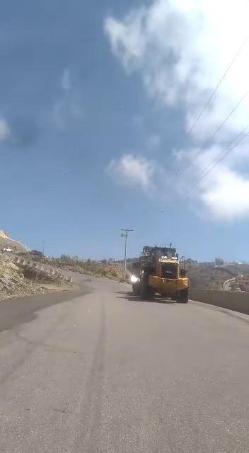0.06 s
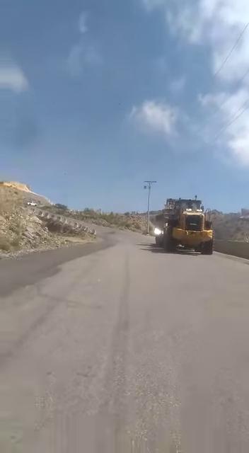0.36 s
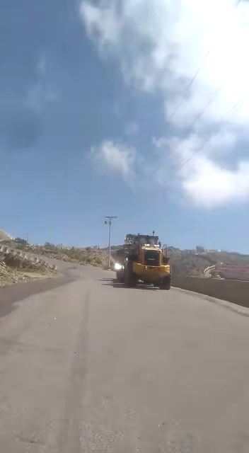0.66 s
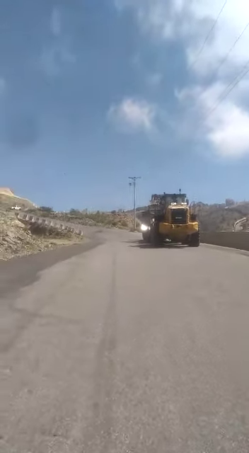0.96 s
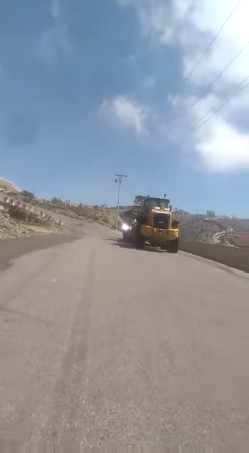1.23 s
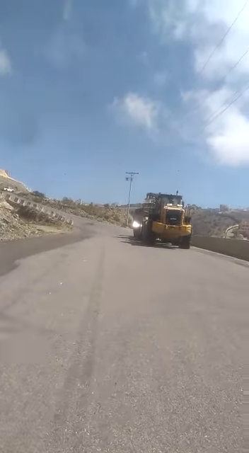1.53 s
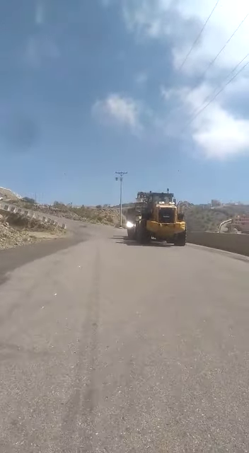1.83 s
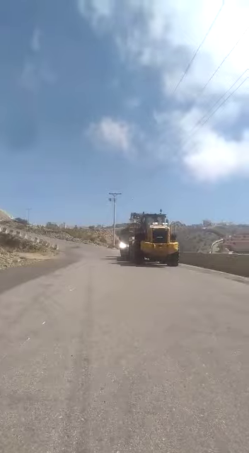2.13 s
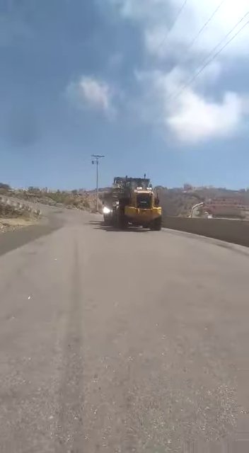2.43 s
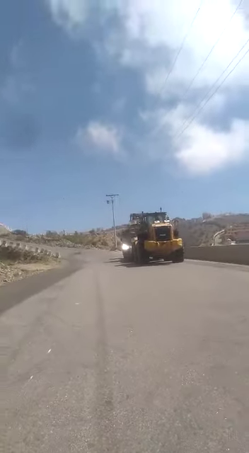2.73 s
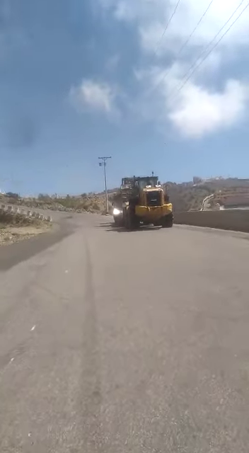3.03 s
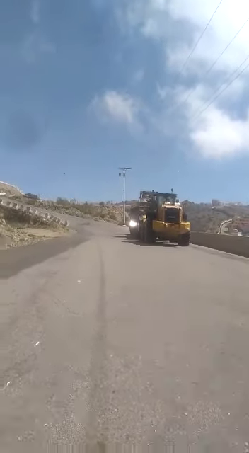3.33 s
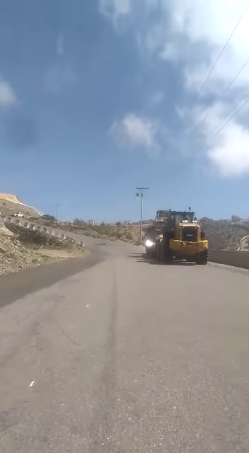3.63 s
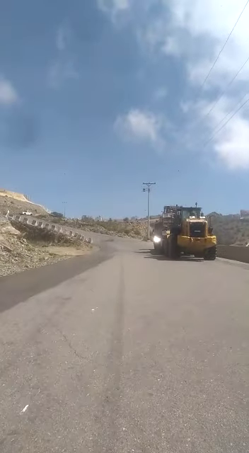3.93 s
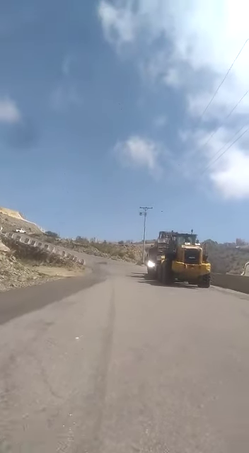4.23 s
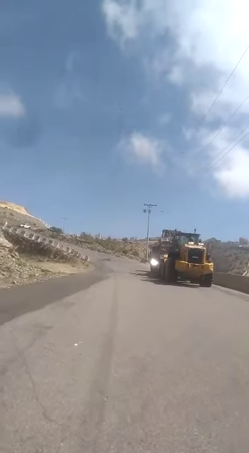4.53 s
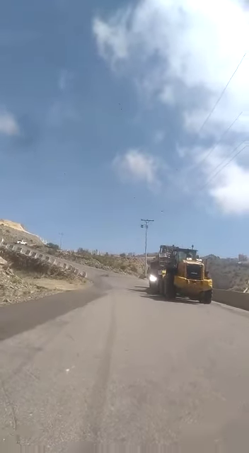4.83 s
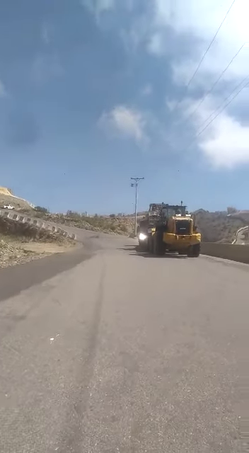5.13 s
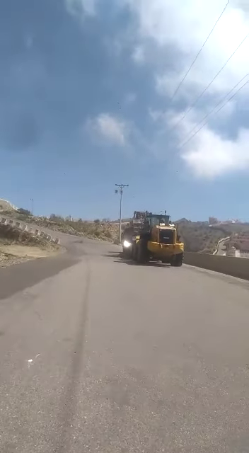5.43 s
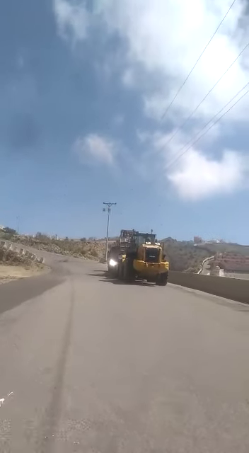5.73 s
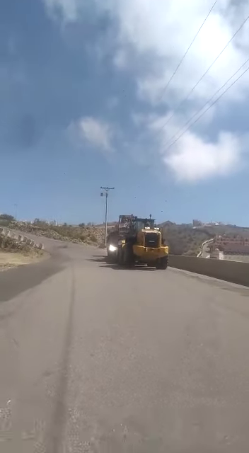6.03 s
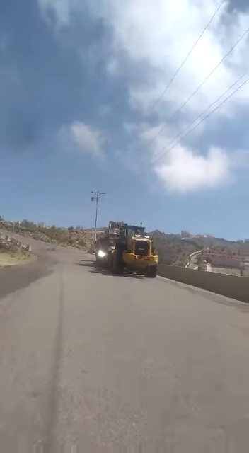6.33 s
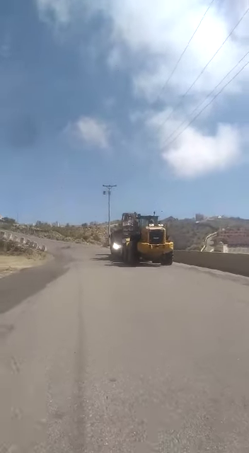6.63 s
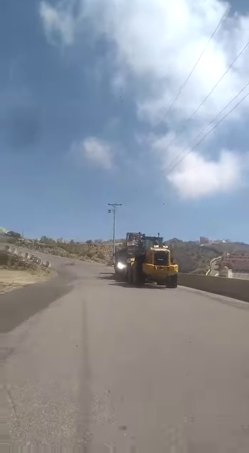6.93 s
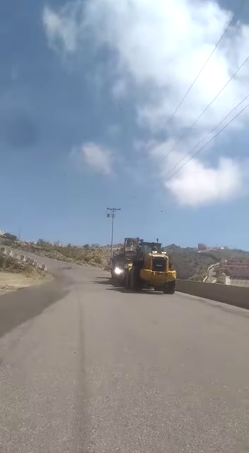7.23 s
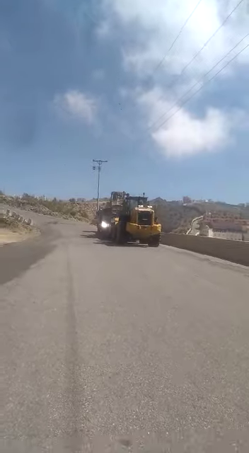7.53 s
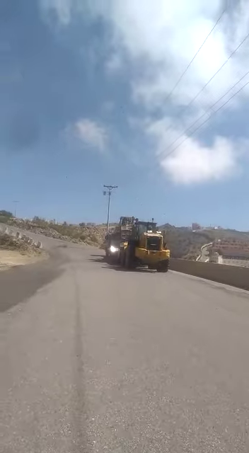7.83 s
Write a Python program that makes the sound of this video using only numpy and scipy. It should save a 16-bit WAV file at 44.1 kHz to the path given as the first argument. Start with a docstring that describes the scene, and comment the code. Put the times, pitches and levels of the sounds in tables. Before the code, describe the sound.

A wheel loader's diesel engine runs at high, steady speed on an outdoor road, its deep exhaust drone throbbing and swelling over a softer fan roar and clatter. Faint gear whines come and go, and a very thin, high whistle slowly sinks. Soft footsteps scuff the grit throughout, with a tiny snap about halfway. Light wind rumbles on the microphone.

```python
"""A deep, throbbing diesel drone: a wheel loader crawls up a mountain road, its six cylinders near full speed.
Firing pulses boom in the exhaust pipe and echo off the hillside, the block clatters and the fan roars.
Gears whine in step with the crankshaft while the turbocharger's thin whistle slowly winds down.
The listener follows on foot, soles scuffing the grit, as light wind rumbles on two microphone ports."""
import sys
import numpy as np
from scipy import signal
from scipy.fft import rfft, irfft
from scipy.io import wavfile
from scipy.ndimage import uniform_filter1d

SR = 44100
rng = np.random.default_rng(int(sys.argv[2]) if len(sys.argv) > 2 else 0)


def pcm_store(signal):
    """Save signal as 16-bit PCM."""
    levels = np.round(np.clip(np.atleast_2d(signal), -1, 1) * 32767)
    wavfile.write(sys.argv[1], SR, levels.astype(np.int16).T)


N = 355874
TIME = np.arange(N) / SR
BINS = np.fft.rfftfreq(N, 1 / SR)

# fader ride for the machine's roar and clatter, which the whines follow: time_s, level_db
ROAR_RIDE = [(0, -27.5), (.6, -27.4), (2.6, -27.5), (3.2, -29), (4.0, -28), (4.9, -30), (6.6, -29),
             (8.07, -30)]


def amp(db):
    """Decibels to gain."""
    return 10 ** (np.asarray(db) / 20)


def unit(x):
    """Scales to rms 1."""
    return x / np.sqrt(np.mean(np.abs(x) ** 2) + 1e-20)


def curve(rows):
    """An envelope for each value column of a time table, in straight ramps."""
    time_s, *columns = np.transpose(rows)
    return np.squeeze([np.interp(TIME, time_s, column) for column in columns])


def over_bins(points):
    """Spreads frequency breakpoints over the FFT bins, on a log axis."""
    hz, value = np.transpose(points)
    return np.interp(np.log(BINS + 1), np.log(hz + 1), value)


def drift(rate_hz, size=32768):
    """A smooth random wobble of rms 1, with little above the given rate."""
    low_pass = np.exp(-(BINS[:size // 2 + 1] / rate_hz) ** 2)
    points = irfft(rfft(rng.standard_normal(size)) * low_pass)
    return unit(np.interp(TIME, np.linspace(0, TIME[-1], size), points))


def fading(rate_hz):
    """A wandering complex gain: many reflections adding up."""
    return unit(drift(rate_hz) + 1j * drift(rate_hz))


def tone(turns, gain):
    """A sinusoid from its phase in turns; the complex gain sets level and phase offset."""
    return (gain * np.exp(2j * np.pi * turns)).real


def whistle(pitch_hz, width_hz):
    """A fuzzy tone that follows a pitch curve."""
    return unit(tone(np.cumsum(pitch_hz) / SR, fading(width_hz)))


def ports(pair, spectrum):
    """Colours two unrelated signals and blends them to stereo: centred low mids, wide treble."""
    # how alike the two microphone ports sound: freq_hz, likeness (0 to 1)
    port_likeness = [(20, .25), (40, .55), (70, .85), (110, .96), (200, .993), (600, .95), (1000, .88),
                     (1550, .78), (2500, .6), (4000, .25), (6000, .02)]
    likeness = np.clip(over_bins(port_likeness), 0, 1)
    mid = rfft(pair[0]) * np.sqrt(1 + likeness)
    side = rfft(pair[1]) * np.sqrt(1 - likeness)
    roll_off = np.maximum(BINS / spectrum[-1][0], 1) ** -5
    out = irfft(np.array([mid + side, mid - side]) * amp(over_bins(spectrum)) * roll_off, N)
    return out / np.std(out.mean(axis=0))


def noise(spectrum):
    """Coloured stereo noise."""
    return ports(rng.standard_normal((2, N)), spectrum)


def exhaust(cycle, boom_order=12, boom_top_order=16, lines_db=2.5, follow=0.11):
    """The pipe booms at twice the firing rate; unequal cylinders add lines that beat against it."""
    # fader ride for the boom: time_s, level_db
    boom_ride = [(0.0, -11.5), (0.38, -16), (0.54, -9), (1.14, -16), (1.48, -12), (1.79, -15.2),
                 (3.15, -13.5), (3.68, -8.3), (4.13, -13), (4.48, -9.9), (5.9, -13), (7.13, -11.5),
                 (8.07, -16.8)]
    # the other exhaust lines: order (multiple of the cycle rate), relative_db
    exhaust_lines = [(4, -41), (5, -41), (6, -36), (9, -36), (10, -24), (11, -31), (13, -35.5), (14, -37),
                     (15, -45), (16, -45), (18, -42), (20, -44), (22, -51), (24, -34), (26, -42), (27, -49),
                     (28, -49), (30, -50), (32, -52), (43, -49), (45, -50), (46, -49), (48, -47), (50, -48)]
    # fader ride for the lines above the boom: time_s, gain_db
    overtone_ride = [(0, -1.5), (1.7, 1.5), (2.1, 2), (3.7, 3.5), (4.1, -0.5), (7.4, 1), (8.07, -2.5)]
    boom_db = curve(boom_ride)
    out = amp(boom_db) * np.cos(2 * np.pi * boom_order * cycle)
    low_gain = amp(lines_db + follow * (boom_db - boom_db.mean()))
    high_gain = amp(lines_db + curve(overtone_ride))
    for order, db in exhaust_lines:
        # weak lines fade in and out among the reflections from road and hillside
        reflected = min(amp(-46 - db), .7)
        path = np.sqrt(1 - reflected ** 2) + reflected * fading(1.85)
        # away from the boom, the lines arrive out of step
        lag = rng.random() * (abs(order - boom_order) > 2)
        gain = high_gain if order > boom_top_order else low_gain
        out += gain * amp(db) * tone(order * cycle + lag, path)
    return out


def hillside(x, wet_db=-23, t60_s=.5, predelay_s=.012):
    """Scattered echoes from the slope and the roadside wall, different at each port."""
    t = TIME[:SR // 2]
    taps = rng.standard_normal((2, len(t))) * amp(-60 * t / t60_s) * (t > predelay_s)
    taps /= np.linalg.norm(taps, axis=1, keepdims=True)
    return amp(wet_db) * signal.fftconvolve(x[None], taps, axes=1)[:, :N]


def gas_rush(cycle, start_db=-25, end_db=-30, throb=0.13):
    """Turbulent exhaust gas puffs through the pipe resonance, easing as the turbocharger slows."""
    # hollow colour of the pipe: freq_hz, relative_db
    rush_eq = [(40, -14), (90, -9.5), (130, -5.5), (160, 1.5), (200, 0), (235, 0.5), (265, -7.5),
               (320, -14.5), (600, -56)]
    puffs = 1 + throb * np.cos(2 * np.pi * cycle)
    return amp(np.linspace(start_db, end_db, N)) * puffs * noise(rush_eq)


def roar(cycle, trim_db=-1, throb=0.036, knock=0.056, flutter_db=0.4):
    """Fan and combustion noise, pulsing slightly with the cycle and with each of its six firings."""
    # broad midrange body of the roar: freq_hz, relative_db
    roar_eq = [(250, -5.5), (330, -1), (550, -7.5), (680, -2), (810, -0.5), (1080, -3.5), (1250, -2),
               (1400, -5.5), (1800, -5), (2400, -8), (3300, -12.5), (4200, -21), (6000, -36.5),
               (10000, -64.5)]
    firing = 6 * cycle
    pulse = 1 + throb * np.cos(2 * np.pi * cycle) + knock * np.cos(2 * np.pi * firing)
    return amp(trim_db + flutter_db * drift(33)) * pulse * noise(roar_eq)


def clatter(cycle, trim_db=-8, size=2048, layers=4):
    """The block repeats its knocks every cycle; their colour shifts with the listener's position."""
    # colour of the engine block: freq_hz, relative_db
    block_eq = [(150, -35.5), (300, 0.5), (560, -2), (800, -2.5), (950, 2), (1300, -5.5), (2500, -22),
                (5000, -41.5)]
    pair = np.zeros((2, N))
    for port in pair:
        for _ in range(layers):
            weight = drift(0.93)
            knock_loop = rng.standard_normal(size)
            port += weight * np.interp(cycle % 1 * size, np.arange(size), knock_loop)
    return amp(trim_db) * ports(pair, block_eq)


def scuffing_hiss(start_db=-45.5, fade_db_per_s=0.25, half_width_s=.115, grains_per_s=250):
    """Air hiss with a fine crackle of grit; it fades slowly and swells as each sole scuffs the road."""
    # scuffs at a walking pace: peak_s, rise_db
    scuffs = [(.11, 3), (.6, 1.5), (1.14, 3), (1.6, 2.4), (1.84, 3), (2.28, 2.4), (2.74, 3.5), (3.22, 2.8),
              (3.71, 3), (4.3, 2.2), (4.59, 4), (5.41, 2.5), (6.58, 1), (6.85, 2), (7.4, 2)]
    # bright, sandy colour of the hiss: freq_hz, relative_db
    hiss_eq = [(2000, -20), (3500, -6), (4900, -5), (6000, -2), (6900, 1), (7500, -3), (8200, -10),
               (9200, -15), (10000, -23), (10800, -29.5), (12000, -32), (13000, -36), (15700, -46)]
    scuff_db = sum(rise_db * np.exp(-((TIME - s) / half_width_s) ** 2) for s, rise_db in scuffs)
    level_db = start_db - fade_db_per_s * TIME + scuff_db
    hits = rng.random((2, N)) < grains_per_s / SR
    grains = hits * amp(4 + 3.6 * np.minimum(rng.exponential(1, (2, N)), 4))
    flicker_db = 0.76 * drift(25)
    return amp(level_db + flicker_db) * ports(rng.standard_normal((2, N)) + grains, hiss_eq)


def reflections(x, depth_db=1.35, size=1024, smooth_frames=40):
    """Paths off the road and wall add and cancel, laying a slowly shifting ripple over the spectrum."""
    frames = signal.stft(x, nperseg=size)[2]
    ripple = uniform_filter1d(rng.standard_normal(frames.shape[1:]), smooth_frames, axis=1)
    ripple = uniform_filter1d(ripple, 2, axis=0)
    return signal.istft(frames * amp(depth_db * unit(ripple)), nperseg=size)[1][:, :N]


def whines(cycle, follow=1.1, side_db=-7):
    """Fan blades, pumps and gears sing at set ratios of engine speed and carry as the roar does."""
    # tones of the spinning parts: order, relative_db, width_hz
    rotor_tones = [(5.4, -39, 2), (26.6, -45, 2), (47.8, -50, 3), (49.6, -49, 22), (74.6, -47, 6),
                   (79.75, -55, 3), (144.1, -55, 4), (268, -66, 8)]
    out = np.zeros((2, N))
    for order, db, width_hz in rotor_tones:
        paths = fading(width_hz) + amp(side_db) * np.outer([1, -1], fading(width_hz))
        out += amp(db) * unit(tone(order * cycle, paths))
    roar_db = curve(ROAR_RIDE)
    return out * amp(follow * (roar_db - roar_db.mean()))


def gear_swells(cycle, width_hz=7):
    """Now and then a gear tone rises out of the roar and sinks back."""
    # swelling gear tones: peak_s, level_db, order, half_width_s
    swells = [(1.6, -48.5, 144.1, 1.7), (2.7, -44, 49.6, .15), (4.15, -39.5, 47.9, .2),
              (5.5, -44, 46.2, .25), (6.65, -38.5, 47.9, .17)]
    out = np.zeros(N)
    for peak_s, db, order, half_width_s in swells:
        envelope = np.exp(-((TIME - peak_s) / half_width_s) ** 2)
        out += amp(db) * envelope * unit(tone(order * cycle, fading(width_hz)))
    return out


def turbo(blade_db=-66.5, blade_width_hz=24, intake_db=-66, intake_width_hz=420, flare_db=4):
    """The thin whistle of the compressor blades flares at random inside a narrow band of intake hiss."""
    # the whistle sinks in two stages: time_s, pitch_hz
    wind_down = [(0, 10000), (3.7, 9700), (5.15, 9150), (6.55, 9130), (7.4, 8790), (8.07, 8400)]
    hz = curve(wind_down)
    # the lower it sinks, the better it carries through the air
    carry = amp((hz.mean() - hz) * .002)
    flare = unit(amp(flare_db * drift(3)))
    out = np.zeros((2, N))
    for port in out:
        port += amp(blade_db) * flare * whistle(hz, blade_width_hz)
        port += amp(intake_db) * whistle(hz, intake_width_hz)
    return carry * out


def wind(lumps_db=2.0):
    """Light wind buffets the ports with a lumpy rumble."""
    # fader ride for the breeze: time_s, level_db
    wind_ride = [(0, -23), (.5, -26.5), (1.7, -30.5), (2.6, -33), (4, -31), (6.8, -30.5), (8.07, -26.5)]
    # bass-heavy colour of the buffeting: freq_hz, relative_db
    wind_eq = [(5, -2), (15, -1), (30, -1), (45, -2), (62, 0), (100, -4), (150, -13), (300, -28),
               (1000, -55)]
    return amp(curve(wind_ride) + lumps_db * drift(11)) * noise(wind_eq)


def spike(peak_s, decay_s):
    """An envelope that rises and falls exponentially around a sharp peak."""
    return np.exp(-np.abs(TIME - peak_s) / decay_s)


def gust_bump():
    """A gust gives the microphone one short, low push."""
    # the thump: peak_s, level_db, pitch_hz, decay_s
    thumps = [(.523, -11, 65, .009)]
    return sum(amp(db) * spike(s, decay_s) * np.cos(2 * np.pi * hz * (TIME - s))
               for s, db, hz, decay_s in thumps)


def falling_whine():
    """One short whine from the machine swells and sags in pitch."""
    # its glide: time_s, pitch_hz, level_db
    glide = [(1.95, 810, -60), (2.05, 860, -42), (2.17, 820, -44), (2.26, 750, -39), (2.36, 695, -40),
             (2.48, 690, -60)]
    hz, db = curve(glide)
    gate = (TIME > glide[0][0]) & (TIME < glide[-1][0])
    return amp(db) * whistle(hz, width_hz=12) * gate


def grit_snaps():
    """Single grains crack on the asphalt, each a tiny burst of treble."""
    # the snaps: peak_s, level_db, decay_s
    snaps = [(4.1337, -25, .0006), (4.591, -35, .0005)]
    # crisp colour of a snap: freq_hz, relative_db
    snap_eq = [(2500, -22), (5000, -11), (6200, -1), (7200, 0), (8500, -10), (10500, -23), (13500, -36)]
    return noise(snap_eq) * sum(amp(db) * spike(s, decay_s) for s, db, decay_s in snaps)


def scene():
    """Mixes machine, footsteps and wind; the crankshaft clocks the exhaust, block and gears."""
    # crankshaft speed: time_s, speed_rpm
    engine_speed = [(0.0, 2035.1), (0.5, 2036.7), (1.5, 2048.1), (2.0, 2040.3), (2.5, 2040.1),
                    (3.65, 2052.3), (4.1, 2075.2), (4.7, 2068.7), (6.0, 2048.0), (6.7, 2083.8),
                    (7.0, 2063.6), (7.35, 2069.7), (7.7, 2041.9), (8.07, 2035.2)]
    # running count of four-stroke cycles, two crank turns each
    cycle = .129 + np.cumsum(curve(engine_speed)) / 120 / SR
    pipe = exhaust(cycle)
    drone = pipe + hillside(pipe) + gas_rush(cycle)
    din = amp(curve(ROAR_RIDE)) * (roar(cycle) + clatter(cycle)) + scuffing_hiss()
    tones = whines(cycle) + gear_swells(cycle) + falling_whine() + turbo()
    return drone + reflections(din) + tones + wind() + gust_bump() + grit_snaps()


def record(dry, cutoff_hz=15700):
    """Each microphone port adds its own colour, then a steep low-pass trims the top."""
    # stereo lean across the spectrum: freq_hz, left_minus_right_db
    port_balance = [(60, .3), (200, 1.4), (400, 1), (950, 2.2), (1550, 4.8), (2500, 3.5), (3300, -1),
                    (4000, -5.5), (5200, -1.5), (7000, 4), (8200, 7), (10000, 7.5)]
    tilt = amp(np.outer([.5, -.5], over_bins(port_balance)))
    soft_ends = signal.windows.tukey(N, .001)
    heard = irfft(rfft(dry * soft_ends) * tilt / tilt.mean(axis=0), N)
    low_pass = signal.firwin(511, cutoff_hz, window=("kaiser", 9), fs=SR)
    return signal.oaconvolve(heard, low_pass[None], "same", axes=1)


dry = scene()
out = record(dry)
pcm_store(out)
```